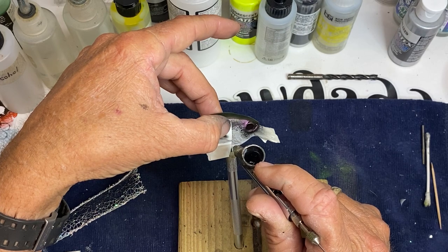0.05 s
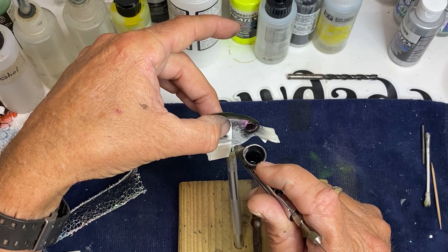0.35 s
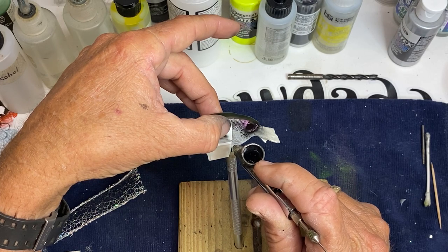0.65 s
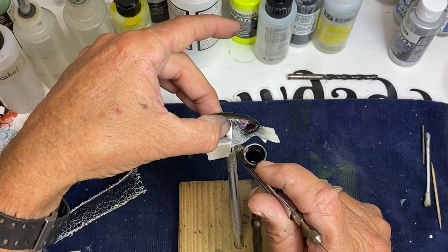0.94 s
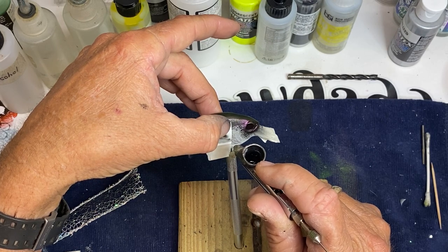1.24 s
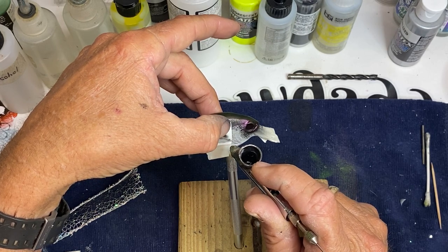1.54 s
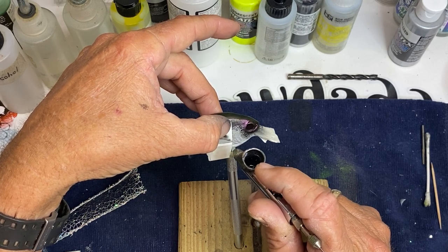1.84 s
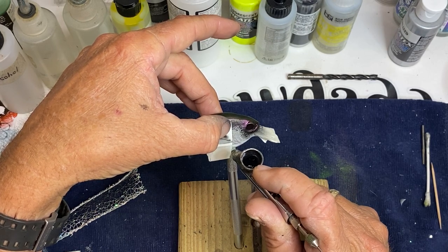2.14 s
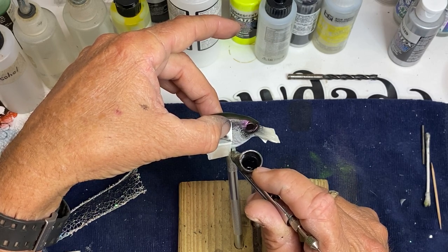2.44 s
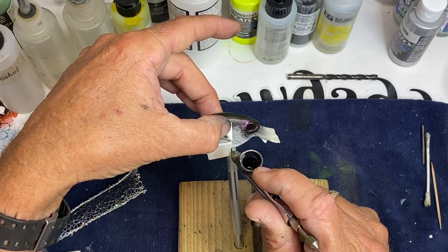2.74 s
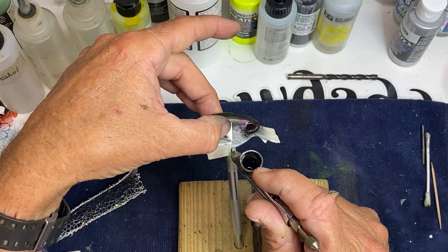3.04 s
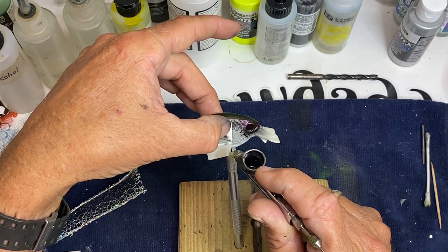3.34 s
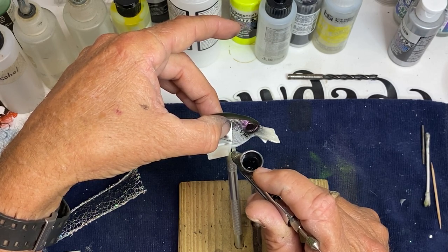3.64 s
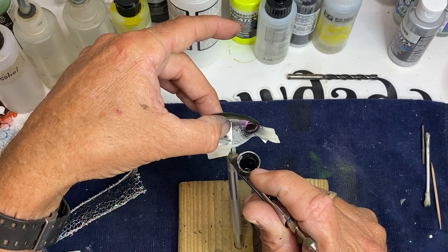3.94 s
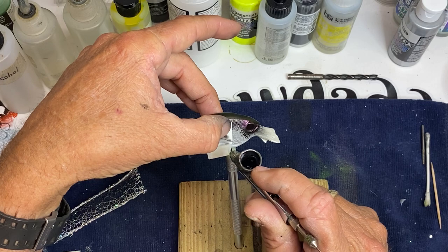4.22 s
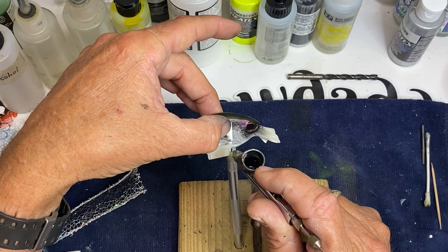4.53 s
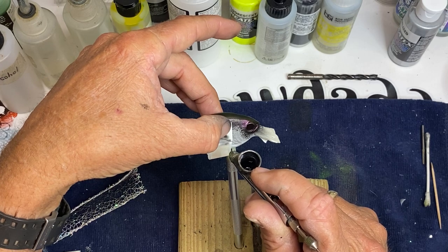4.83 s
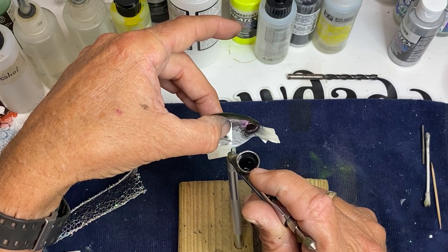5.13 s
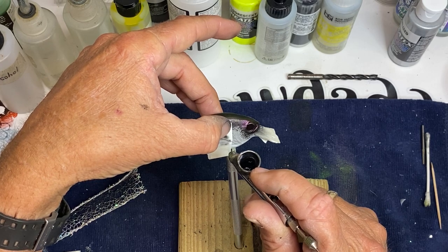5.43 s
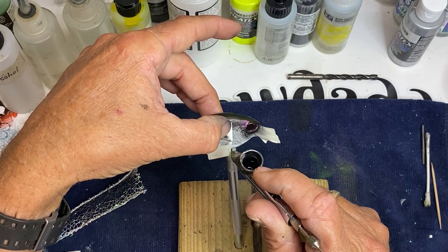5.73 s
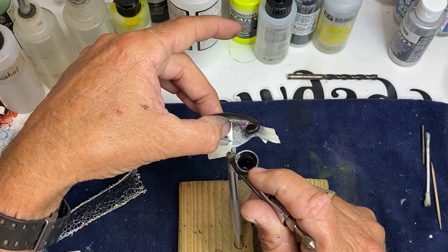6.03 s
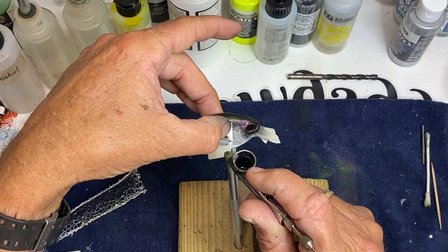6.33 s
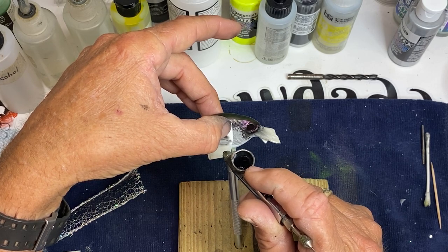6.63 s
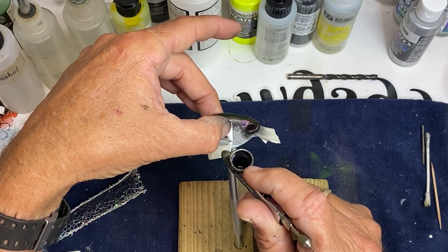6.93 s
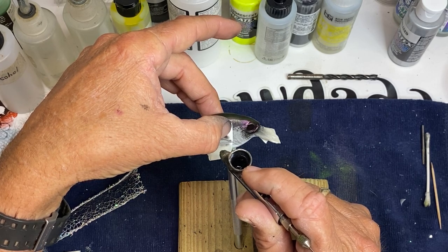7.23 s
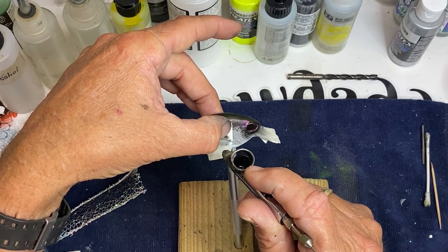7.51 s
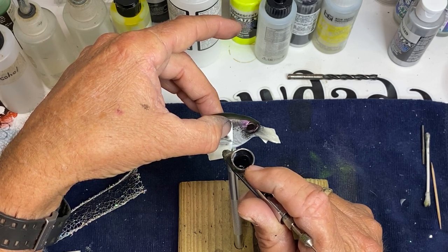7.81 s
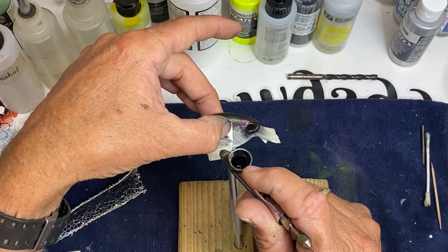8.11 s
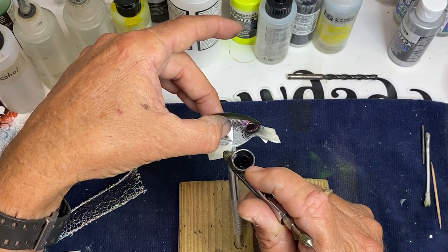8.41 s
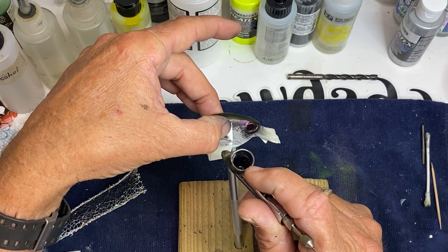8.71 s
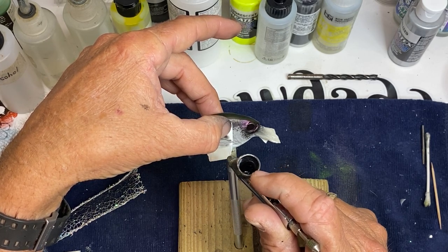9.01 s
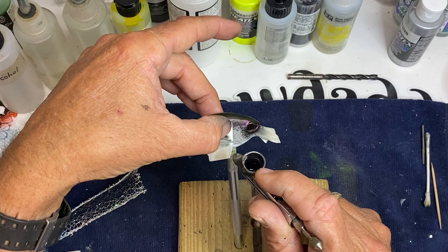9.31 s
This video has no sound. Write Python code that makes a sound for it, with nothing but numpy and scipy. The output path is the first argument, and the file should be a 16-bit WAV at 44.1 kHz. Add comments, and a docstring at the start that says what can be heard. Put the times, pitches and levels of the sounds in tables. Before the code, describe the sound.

An airbrush sprays a fishing lure close to a phone microphone in a small workshop. Its bright hiss is already going, stops with a soft trigger thud after about two seconds, and resumes half a second later for a long run. The hiss swells and shifts in tone as the jet moves over the lure, then cuts off sharply. A faint distant engine rumbles up and fades underneath.

```python
"""An airbrush sprays a fishing lure over a towel-covered bench, close to a phone, in two trigger runs.
The nozzle hisses; the hiss grows fuller where the jet strikes the lure, and spent air whirls round
the lure's edge and rushes over the towel. Bench and phone colour the hiss, paint bottles scatter it
and the small workshop rings briefly. A distant engine rumbles up and fades."""
import sys
import numpy as np
from scipy import signal
from scipy.fft import rfft, irfft, next_fast_len
from scipy.io import wavfile
from scipy.ndimage import uniform_filter1d

SR = 44100
rng = np.random.default_rng(int(sys.argv[2]) if len(sys.argv) > 2 else 0)


def master_out(mix):
    """Clip the mix to full scale and print it as 16-bit PCM to the path in sys.argv[1]."""
    frames = np.transpose(np.atleast_2d(mix))
    ceiling = np.clip(frames, -1, 1)
    pcm = np.round(ceiling * 32767).astype(np.int16)
    wavfile.write(sys.argv[1], SR, pcm)


N = 421596
TIME_S = np.arange(N) / SR
FFT_SIZE = next_fast_len(N + SR)
FREQ_HZ = np.arange(FFT_SIZE // 2 + 1) * SR / FFT_SIZE


def undb(db):
    """Decibels to gain."""
    return 10 ** (np.asarray(db) / 20)


def gains(table):
    """One gain curve over time per dB column."""
    t_s, *columns = np.transpose(table)
    return [undb(np.interp(TIME_S, t_s, db)) for db in columns]


def filtered(x, response):
    """Apply a frequency response."""
    return irfft(rfft(x, FFT_SIZE) * response, FFT_SIZE)[..., :N]


def convolved(x, impulse_pair):
    """Mono through a stereo impulse response whose first channel is scaled to unit energy."""
    return signal.fftconvolve(x[None], impulse_pair / np.linalg.norm(impulse_pair[0]), axes=1)[:, :N]


def noise(spectrum):
    """Coloured noise, rms 1."""
    hz, db = np.transpose(spectrum)
    response = undb(np.interp(np.log(FREQ_HZ + 1), np.log(hz), db)) * (FREQ_HZ > 15)
    x = filtered(rng.standard_normal(N), response)
    return x / x.std()


def wander(rate_hz):
    """Slewed random steps, spread near 1."""
    hold = max(int(SR / rate_hz), 2)
    steps = np.repeat(rng.standard_normal(N // hold + 1), hold)
    return 1.32 * uniform_filter1d(steps, hold)[:N]


# Left-right phase of the hiss: f/Hz, left lead/rad
LEFT_LEAD = [(0, 0), (3900, 0), (4400, .85), (4600, .7), (4800, .2), (5250, .2), (6900, 2.75), (8000, 3.8),
             (10200, 6.2), (10900, 6.35), (11300, 7.1), (13000, 8.95), (15700, 11.6)]

def stereo_phase(x):
    """Mono below about 4 kHz, left leading in uneven steps above."""
    lead_rad = np.interp(FREQ_HZ, *np.transpose(LEFT_LEAD))
    return filtered(x, np.exp(-1j * lead_rad * np.array([[0], [1]])))


# Stereo width of echoes and room tone per band: f/Hz, side gain/dB
SIDE_GAIN = [(60, -13), (160, -6.5), (300, 0), (600, -1), (900, -1), (1300, -7), (1900, -27.5), (2500, -25),
             (3300, -29), (4300, -4), (5800, 2.5), (10500, -5.5), (15000, -2)]

def stereo_spread(mid, side):
    """Mid and side to left and right, nearly mono around 2-3 kHz."""
    width = undb(np.interp(FREQ_HZ, *np.transpose(SIDE_GAIN)))
    return stereo_phase(mid) + filtered(side, width) * np.array([[1], [-1]])


# Workshop air: f/Hz, relative level/dB
AIR_SPECTRUM = [(25, -16.5), (55, -1), (105, -3.5), (170, -11), (240, -11.5), (450, -18), (900, -18.5),
                (1040, -13.5), (1200, -23), (2000, -26.5), (5000, -32), (10000, -46.5), (15000, -54.5)]

def room_tone(level_db, side_db):
    """Quiet, steady workshop air."""
    centre = noise(AIR_SPECTRUM)
    sides = stereo_spread(np.zeros(N), noise(AIR_SPECTRUM))
    return undb(level_db) * (centre + undb(side_db) * sides)


# Engine swell and fade: t/s, level/dB
ENGINE_LEVEL = [(0, -77), (1.7, -77), (2.05, -83.5), (2.8, -80), (3.6, -70.5), (4.6, -71.5), (5.25, -64.5),
                (6.1, -69), (7.0, -62), (7.5, -65), (7.95, -61.5), (8.55, -66), (8.8, -72), (9.2, -74),
                (9.56, -80)]
# Rumble spectrum and hum tones: f/Hz, relative level/dB
RUMBLE_SPECTRUM = [(20, -39), (35, -19), (57, -5), (70, -1.5), (88, 0), (125, -1), (150, -7), (200, -11.5),
                   (245, -14), (300, -16), (600, -19), (1500, -49)]
HUM_TONES = [(55, -10), (113, -1), (242, -11.5)]

def distant_engine(hum_re_rumble_db, hum_db_per_db):
    """Surging rumble through the walls; its wavering hum stands out as it gets louder."""
    rumble_gain, = gains(ENGINE_LEVEL)
    peak = rumble_gain.max()
    hum_gain = undb(hum_re_rumble_db) * peak * (rumble_gain / peak) ** hum_db_per_db
    hum = 0
    for hz, db in HUM_TONES:
        amplitude = np.sqrt(2) * undb(db + 2 * wander(4))
        hum += amplitude * np.sin(2 * np.pi * hz * TIME_S + 1.2 * wander(9.5))
    rumble = rumble_gain * noise(RUMBLE_SPECTRUM)
    surge = undb(.8 * wander(12) + 1.2 * wander(5))
    return rumble * surge + hum_gain * hum


def workshop_reverb(x, wet_db, t60_low_s, t60_high_s):
    """Short mid/side room tail that dies sooner in the treble."""
    age_s = TIME_S[:SR // 2]
    reflections = rng.standard_normal((2, len(age_s))) * (age_s > .004)
    low = signal.sosfilt(signal.butter(2, 2500, fs=SR, output="sos"), reflections)
    high = reflections - low
    tail = low * undb(-60 * age_s / t60_low_s) + high * undb(-60 * age_s / t60_high_s)
    return undb(wet_db) * convolved(x, tail)


def bottle_echoes(x, wet_db, decay_s):
    """Quick mid/side echoes off the paint bottles ripple the spectrum."""
    age_s = TIME_S[:SR // 20]
    scatter = rng.standard_normal((2, len(age_s))) * np.exp(-age_s / decay_s) * (age_s > .002)
    return undb(wet_db) * convolved(x, scatter)


# Peaks and dips of bench and phone ports: f/Hz, width/Hz, nominal gain/dB
BENCH_MODES = [(545, 40, 2), (690, 90, 3.5), (915, 30, -4), (1027, 125, 6.5), (1386, 50, -6),
               (1630, 400, 10), (2079, 216, 5.1), (2355, 85, -17), (2669, 88, -5.9), (2808, 65, -4.5),
               (3024, 300, 2.7), (3412, 150, 7.4), (3679, 95, 4), (3845, 75, -9), (4387, 83, 7),
               (4590, 117, 6.5), (4905, 160, 7.6), (5251, 66, -6), (5612, 75, 4), (5880, 450, -3.2),
               (6355, 112, 3.2), (6780, 90, 4.3), (7803, 300, -5), (8070, 360, 7), (8760, 409, 8),
               (9300, 200, -4.5), (9720, 270, 6.3), (10150, 180, 3), (10585, 230, 8.5), (11220, 200, -3.5),
               (11505, 200, 5.5), (12230, 200, 3), (12595, 220, -4.5)]

def bench_resonance(x, lure_gain):
    """Resonances deepen as the jet bears on the lure and the source gets more compact."""
    curve_db = sum(db / (1 + (2 * (FREQ_HZ - hz) / width_hz) ** 2) for hz, width_hz, db in BENCH_MODES)
    broad_db = uniform_filter1d(curve_db, int(1200 * FFT_SIZE / SR))
    shallow, deep = (filtered(x, undb(broad_db + depth * (curve_db - broad_db))) for depth in (.6, 1.45))
    ref_db, focus_at_ref, focus_per_db = -41, .43, .035
    focus = np.clip(focus_at_ref + focus_per_db * (20 * np.log10(lure_gain) - ref_db), 0, 1)
    return shallow * (1 - focus) + deep * focus


def trigger_thud(start_s, level_db, decay_s):
    """The trigger springs back: two heavily damped modes of hand and brush."""
    age_s = np.maximum(TIME_S - start_s, 0)
    modes = sum(np.sin(2 * np.pi * hz * age_s) for hz in (85, 150))
    return undb(level_db) * modes * np.exp(-age_s / decay_s)


def valve_leak(start_s, level_db):
    """Thin, high hiss as the finger rests on the trigger again."""
    onset = np.clip((TIME_S - start_s) / .025, 0, 1)
    hiss = noise([(5000, -40), (10000, -21.5), (12500, -5), (13800, -2), (15000, -18)])
    return undb(level_db) * onset * hiss


# Trigger runs, the first already under way: open/s, shut/s
TRIGGER_RUNS = [(-1, 1.808), (2.40, 8.959)]

def valve_flow(leak_s=.083, leak_db=-23, open_db_per_s=540, shut_db_per_s=1500):
    """Air flow per run: brief leak, quick opening, steady hold, snap shut."""
    flow = 0
    for open_s, shut_s in TRIGGER_RUNS:
        leak = undb(leak_db + open_db_per_s * np.minimum(TIME_S - (open_s - leak_s), 0))
        opening = undb(open_db_per_s * np.minimum(TIME_S - open_s, 0))
        closing = undb(-shut_db_per_s * np.maximum(TIME_S - shut_s, 0))
        flow += np.maximum(opening, leak) * closing
    return flow


# Aim held between strokes: t/s, nozzle level/dB, lure level/dB
HELD_AIM = [(0, -32.8, -47.3), (1.22, -34.6, -47.6), (1.81, -32.2, -43.1), (2.4, -38.3, -51),
            (2.82, -39.2, -50.7), (2.89, -35.6, -49.6), (3.39, -36.3, -50.3), (4.5, -34.6, -48.2),
            (5.74, -33.3, -43.1), (6.23, -25.7, -44), (7.11, -24.1, -37.6), (7.18, -31.6, -40.5),
            (7.55, -38.1, -35.9), (8.95, -37.5, -35.8)]
# Spent air, before trims: t/s, towel level/dB, whirl level/dB
SPENT_AIR = [(0, -54.4, -51.5), (.59, -57, -50.9), (1.23, -57.1, -51.3), (1.56, -60.2, -51.5),
             (1.74, -49.8, -47.3), (2.43, -53.3, -53.3), (2.81, -52.8, -56.3), (2.92, -49.9, -49.3),
             (3.38, -50.1, -52.4), (3.99, -49.7, -50.1), (4.81, -48.2, -50.8), (5.89, -49.1, -48.4),
             (6.97, -53.5, -54.6), (7.33, -58.8, -55.5), (7.76, -56.8, -48.5), (8.07, -58.7, -54.2),
             (8.6, -55.4, -49.4), (8.93, -56.2, -49.1)]
# Strokes, negative where the jet slips off the lure: centre/s, length/s, nozzle swell/dB, lure swell/dB
HAND_STROKES = [(.08, .21, 1.5, -1.6), (.4, .37, .5, 7.2), (.57, .33, 4.3, 8.6), (.94, .2, .6, 6),
                (1.37, .32, 3.4, 4.1), (1.56, .42, 6.7, 6.7), (3.12, .34, 1, .6), (3.8, .5, 1.9, 7.7),
                (4.1, .45, .3, 10.7), (4.81, .42, 2.8, 5.2), (5.25, .56, 7.6, 6.6), (6.55, .19, -1.4, 1.2),
                (6.71, .14, -1.2, 4.4), (6.93, .13, .2, 2.8), (7.83, .24, -1.5, .8), (8.01, .33, 5.2, 0),
                (8.16, .19, 0, -7.8), (8.27, .32, 2, .3), (8.58, .28, -1.5, 3), (8.76, .14, 5.5, 1.2),
                (8.86, .14, -1.7, -3)]

def hand_aim(whirl_share=.4):
    """Nozzle, lure, towel and whirl gains: the held aim plus a smooth swell per stroke."""
    nozzle_db = lure_db = 0
    for centre_s, length_s, nozzle_swell_db, lure_swell_db in HAND_STROKES:
        swell = np.cos(np.pi * np.clip((TIME_S - centre_s) / length_s, -.5, .5)) ** 2
        nozzle_db += nozzle_swell_db * swell
        lure_db += lure_swell_db * swell
    nozzle, lure = gains(HELD_AIM)
    towel, whirl = gains(SPENT_AIR)
    return nozzle * undb(nozzle_db), lure * undb(lure_db), towel, whirl * undb(whirl_share * lure_db)


def turbulence(spectrum, sway_db, flutter_db):
    """Jet noise that sways with the hand and flutters as paint tears into droplets."""
    return noise(spectrum) * undb(sway_db * wander(22) + flutter_db * wander(450))


# Air noise at nozzle, lure, towel and lure's edge: f/Hz, relative level/dB
NOZZLE_SPECTRUM = [(60, -53.5), (200, -31), (1100, -34), (1700, -37), (2500, -18), (3300, -12), (4500, -10),
                   (6200, -4), (9000, -5.5), (11500, -2.5), (13500, 2), (15500, -1.5)]
LURE_SPECTRUM = [(60, -47), (300, -28.5), (1100, -28), (1700, -28.5), (2500, -6), (3300, -4), (4500, -2),
                 (6400, 0), (8000, -3), (10500, -4), (13000, -6), (15500, -11)]
TOWEL_SPECTRUM = [(40, -23), (150, -10.5), (400, -3.5), (700, -1.5), (1300, -4), (1800, -5), (2800, -0.5),
                  (4600, -6), (6500, -7.5), (10000, -14), (15500, -9.5)]
WHIRL_SPECTRUM = [(500, -40), (1200, -18), (1600, -8.5), (2100, 0), (2700, 1.5), (3500, -5), (5000, -16),
                  (10000, -31.5)]
# Top treble beams forward and fades as the brush turns from the phone: t/s, shelf gain/dB
TREBLE_BEAM = [(0, 4.4), (1.2, 5.5), (2.65, 1.4), (3.28, 4.1), (4.56, 3.1), (5.27, -.2), (5.55, 2.7),
               (6.48, .2), (7.06, -3.9), (7.55, .5)]

def airbrush(nozzle_gain, lure_gain, towel_gain, whirl_gain):
    """One valve feeds nozzle hiss, hiss off the lure, rush over the towel and edge whirl."""
    nozzle = nozzle_gain * turbulence(NOZZLE_SPECTRUM, sway_db=.6, flutter_db=.54)
    lure = lure_gain * turbulence(LURE_SPECTRUM, sway_db=.57, flutter_db=.34)
    towel = undb(-2) * towel_gain * turbulence(TOWEL_SPECTRUM, sway_db=.3, flutter_db=.5)
    whirl = undb(-1.5) * whirl_gain * turbulence(WHIRL_SPECTRUM, sway_db=.35, flutter_db=0)
    hiss = nozzle + lure + towel + whirl
    treble = filtered(hiss, np.clip((FREQ_HZ - 10500) / 3500, 0, 1))
    beam_gain, = gains(TREBLE_BEAM)
    return valve_flow() * (hiss + (beam_gain - 1) * treble)


def scene():
    """Airbrush, echoes and trigger sounds over engine and room tone."""
    nozzle_gain, lure_gain, towel_gain, whirl_gain = hand_aim()
    hiss = airbrush(nozzle_gain, lure_gain, towel_gain, whirl_gain)
    spray = bench_resonance(hiss, lure_gain)
    echoes = bottle_echoes(spray, wet_db=-14.5, decay_s=.0061)
    echoes += workshop_reverb(hiss, wet_db=-12.5, t60_low_s=.34, t60_high_s=.26)
    thud = trigger_thud(start_s=1.817, level_db=-58.5, decay_s=.012)
    leak = valve_leak(start_s=9.505, level_db=-83)
    engine = distant_engine(hum_re_rumble_db=-1.5, hum_db_per_db=1.45)
    air = room_tone(level_db=-79, side_db=-4)
    return air + engine + thud + leak + stereo_spread(*echoes) + stereo_phase(spray)


def record(dry):
    """The phone's steep low-pass."""
    cutoff_hz, transition_hz = 15750, 100
    return filtered(dry, np.clip((cutoff_hz - FREQ_HZ) / transition_hz + .5, 0, 1))


dry = scene()
out = record(dry)
master_out(out)
```